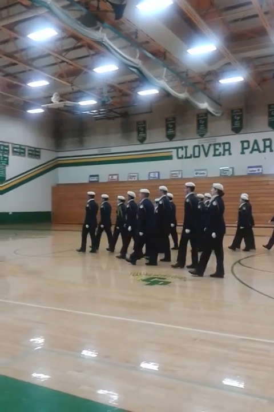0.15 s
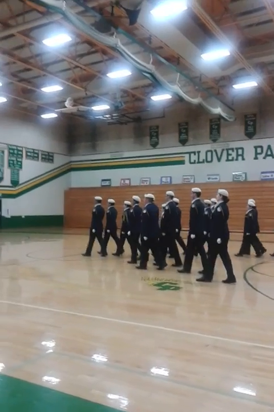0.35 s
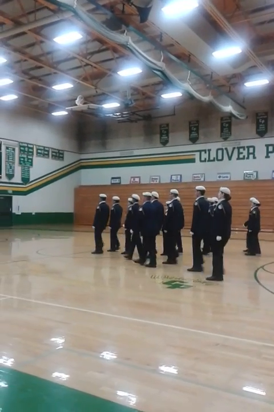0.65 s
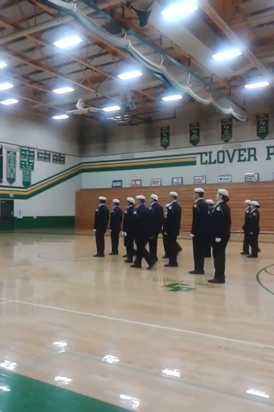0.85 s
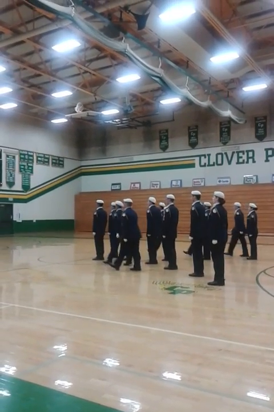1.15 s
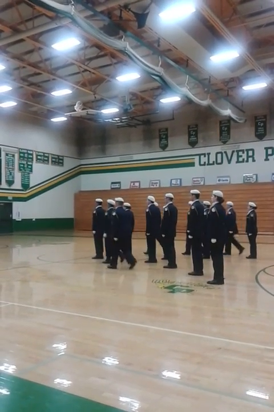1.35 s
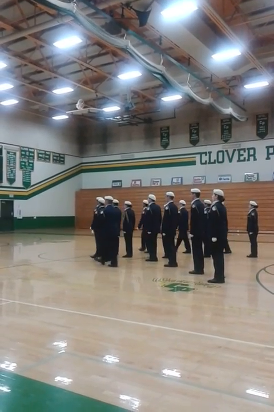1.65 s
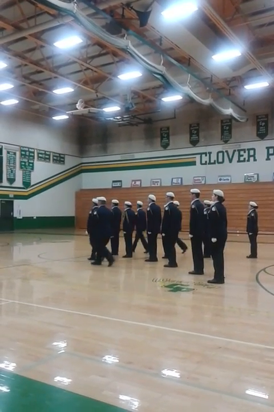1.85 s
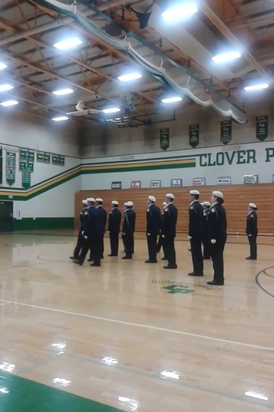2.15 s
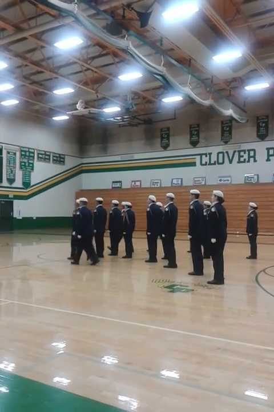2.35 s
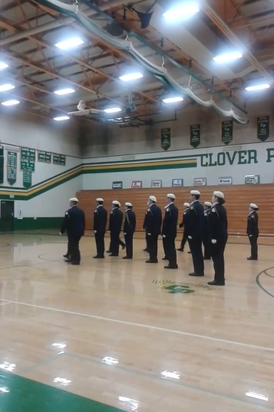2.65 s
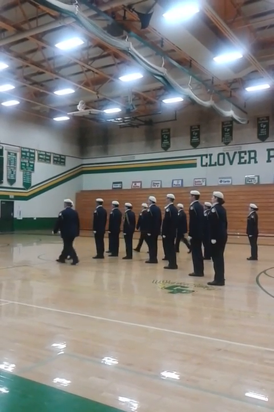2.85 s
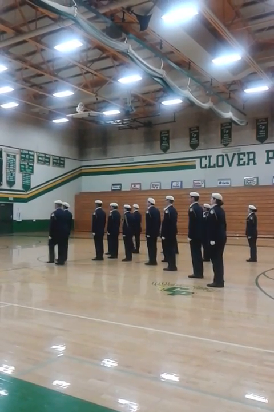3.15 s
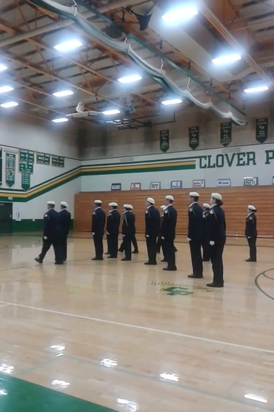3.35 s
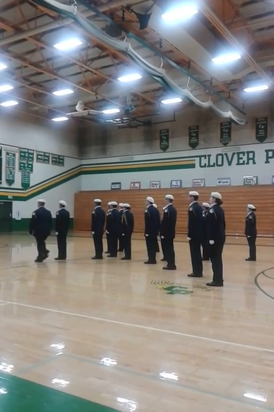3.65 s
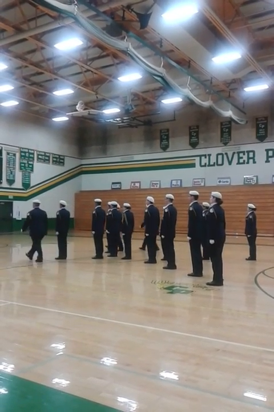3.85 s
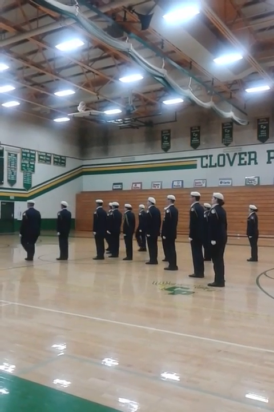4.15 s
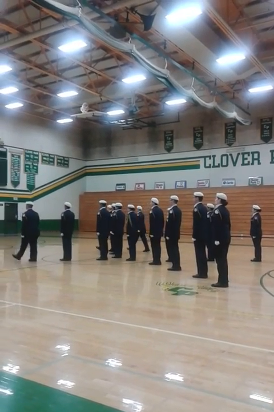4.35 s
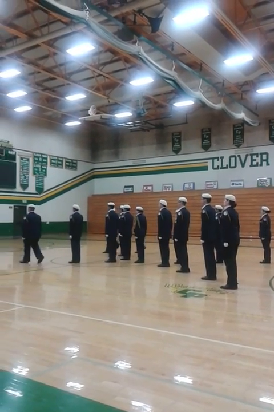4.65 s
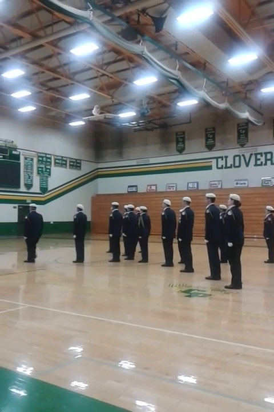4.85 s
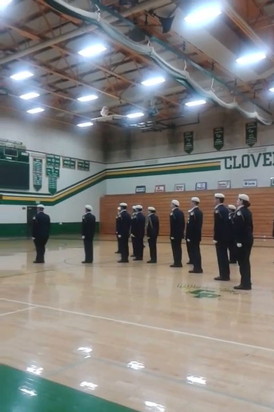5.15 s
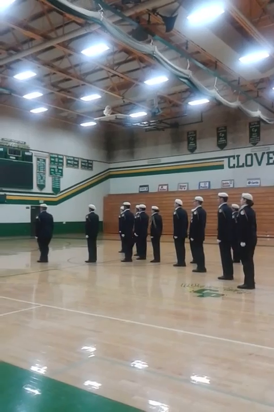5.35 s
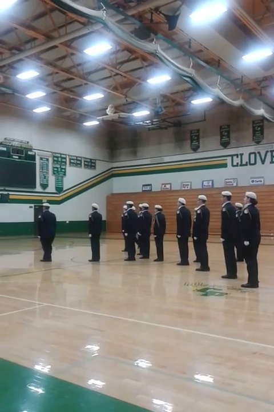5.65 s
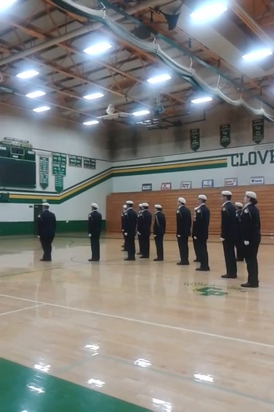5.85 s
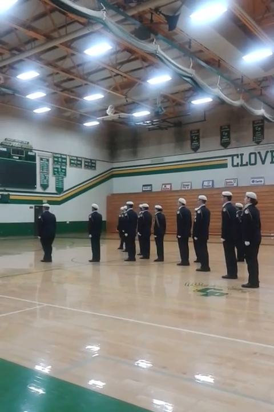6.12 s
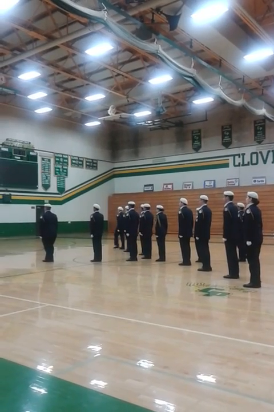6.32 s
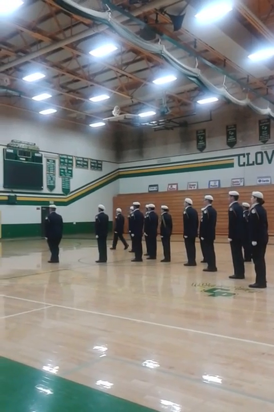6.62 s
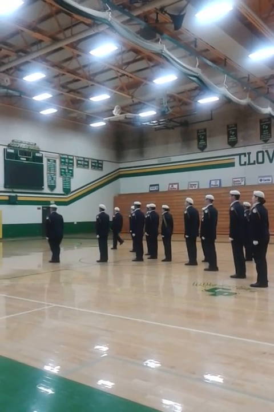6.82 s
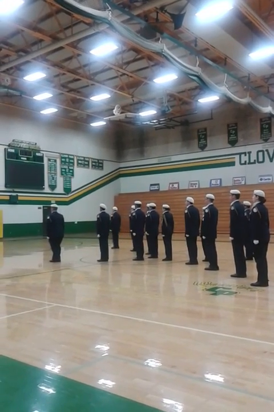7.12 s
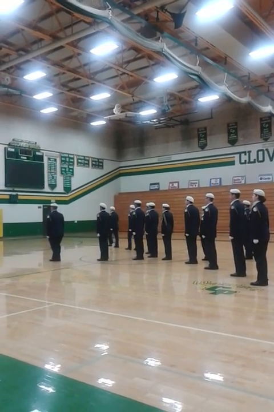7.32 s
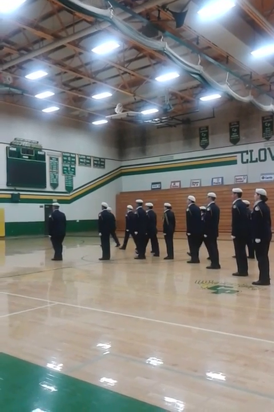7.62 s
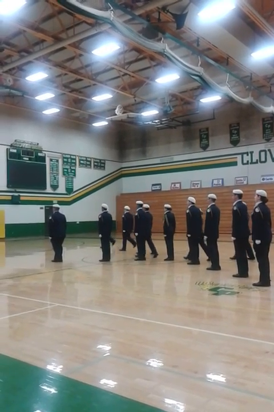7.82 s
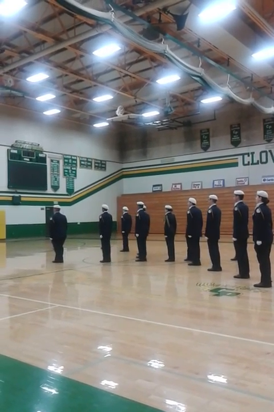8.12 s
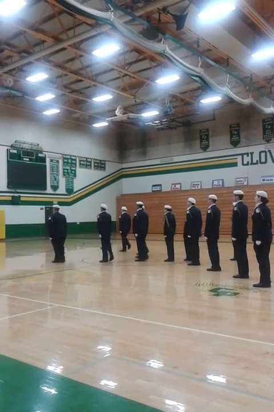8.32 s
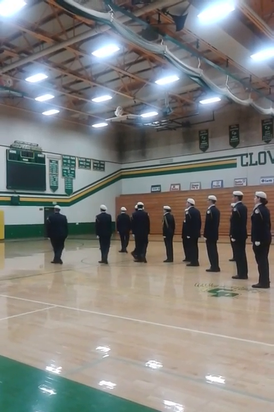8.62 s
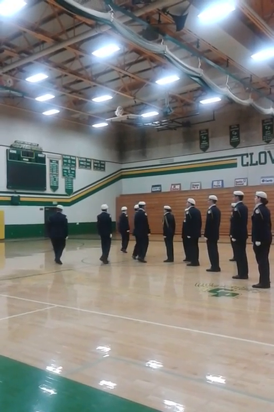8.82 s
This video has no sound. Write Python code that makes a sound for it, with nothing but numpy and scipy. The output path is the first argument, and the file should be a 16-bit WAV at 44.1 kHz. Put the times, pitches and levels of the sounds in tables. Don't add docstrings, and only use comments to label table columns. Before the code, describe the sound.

Many hard soles strike wooden boards nearly together, giving sharp slaps with hollow thumps and a long hall tail. The first and last stamps are strongest, the middle ones varied and sometimes weaker. Between them come sparse shuffling steps, small clicks and brief squeaks; heavier steps end it. Air ducts hum softly throughout, heard from a distant handheld phone.

```python
import sys
import numpy as np
from scipy import signal
from scipy.fft import rfft, irfft
from scipy.io import wavfile
from scipy.ndimage import uniform_filter1d

SR = 44100
rng = np.random.default_rng(int(sys.argv[2]) if len(sys.argv) > 2 else 0)


def voltage_ratio(level):
    return 10 ** (np.asarray(level, float) / 20)


def unload_wav(signal):
    wavfile.write(
        sys.argv[1],
        SR,
        np.round(np.clip(np.atleast_2d(signal).T, -1, 1) * 32767).astype(np.int16),
    )


N = 396018


def colour(x, points):
    hz, db = np.transpose(points)
    f = np.maximum(np.fft.rfftfreq(len(x), 1 / SR), 1)
    level_db = np.interp(np.log(f), np.log(hz), db, db[0] - 30, db[-1] - 30)
    return irfft(rfft(x) * voltage_ratio(level_db), len(x))


def unit(x):
    return x / np.sqrt(np.mean(x ** 2))


def add(track, s, sound):
    i = int(s * SR)
    track[i:i + len(sound)] += sound[:len(track) - i]


def walk(rate_hz):
    k = int(SR / rate_hz)
    held = np.repeat(rng.standard_normal(N // k + 1), k)
    return 0.92 * uniform_filter1d(uniform_filter1d(held, k), k)[:N]


def burst(points, length_s, t, rise_s):
    noise = unit(colour(rng.standard_normal(len(t)), points))
    y = noise * (1 - np.exp(-t / rise_s)) * np.exp(-t / length_s)
    return y / np.abs(y).max()


def all_round(points, like):
    pulse = np.roll(colour(signal.unit_impulse(len(like)), points), 128)
    return unit(pulse) * np.sqrt(np.mean(like ** 2))


# pitch_hz, width_hz, level_db
BOARD_MODES = [(108.6, 140, -23.5), (179.7, 51, -8), (245.5, 39.5, 3.5), (286.3, 45.4, 13), (351, 62, -1.5)]


def thud(t, push_s, spot):
    hz, width_hz, db = np.transpose(BOARD_MODES)[:, :, None]
    chance = rng.standard_normal((2, len(BOARD_MODES), 1))
    level = voltage_ratio(db + 2.5 * chance[0])
    mode_hz = spot * hz * (1 + 0.039 * chance[1])
    ring = level * np.exp(-np.pi * width_hz * t) * np.sin(2 * np.pi * mode_hz * t)
    y = ring.sum(axis=0) * (1 - np.exp(-t / push_s))
    return y / np.abs(y).max()


# start_s, board_pitch_ratio, hall_share_db, hardness_db_per_octave
BEATS = [(0, 1.02, -0.5, -1), (.65, 0.99, 0, -0.5), (1.2, 0.96, 9, 0), (1.69, 0.97, 4, 1),
         (2.26, 1.006, 0.5, -1), (2.79, .82, 2, 0.5), (3.34, 0.99, -2.5, -6.5), (3.89, 0.97, -1, -3.5),
         (4.42, 0.97, 3, 1), (4.88, 1.067, -1.5, -0.85), (6.0, 0.967, 2.5, -2), (7.0, 0.96, 3, 1),
         (7.68, 1.047, -1, -4), (8.03, 1.004, -1, 0.45), (8.5, 1, 2.5, -3)]
# pitch_hz, density_db_per_hz
SOLE = [(210, -29.5), (350, -9.5), (388, -4), (436, -16), (512, -14), (683, -4.5), (880, -4), (1270, -6.5),
        (1930, -7), (2400, -15), (2850, -16), (3590, -15.5), (5500, -32), (7150, -51.5), (12100, -120)]
# pitch_hz, density_db_per_hz
SOLE_TOP = [(2650, -28), (4500, -5), (6360, 2), (8820, 4.5), (10800, -7.5), (14500, -16.5), (15500, -45)]
# pitch_hz, level_db
BOARD_LEAD = [(500, -15), (1100, -2.5), (1800, -1), (2600, -7.5), (5000, -42.5)]
BOARD_LOW_HZ = 103
LATE_S, LATE_HARDNESS_DB, LATE_HALL_DB = 0.091, -2.2, 1


def feet(rows, slap_s, rise_s, push_s, lead_db, boom_db):
    near, sent, t = np.zeros(N), np.zeros(N), np.arange(4096) / SR
    for s, slap_db, thud_db, top_db in rows:
        start_s, spot, hall_db, hardness = [beat for beat in BEATS if beat[0] <= s + 0.02][-1]
        late = np.clip((s - start_s) / LATE_S, 0, 1)
        hall_db = hall_db + late * LATE_HALL_DB
        hardness = hardness + late * LATE_HARDNESS_DB
        sole = [(hz, db + hardness * np.log2(hz / 1000)) for hz, db in SOLE]
        slap = voltage_ratio(slap_db) * burst(sole, slap_s, t, rise_s)
        top = voltage_ratio(top_db) * burst(SOLE_TOP, 0.56 * slap_s, t, 0.00015)
        boards = voltage_ratio(thud_db) * thud(t, push_s, spot)
        add(near, s, slap + top + boards)
        spread = voltage_ratio(boom_db) * boards * np.exp(-t / 0.013)
        to_hall = all_round(sole, slap) + voltage_ratio(-2.5) * all_round(SOLE_TOP, top) + spread
        add(sent, s, voltage_ratio(hall_db) * to_hall)
        lead = voltage_ratio(slap_db + lead_db) * burst(BOARD_LEAD, 0.0036, t[:400], 0.0001)[::-1]
        add(near, max(s - 400 / SR, 0), lead)
    low_cut = signal.butter(2, BOARD_LOW_HZ, "high", fs=SR, output="sos")
    return signal.sosfilt(low_cut, [near, sent])


# start_s, slap_db, thud_re_slap_db, top_re_slap_db
STAMPS = [(0.658, -20, -8.5, -14), (0.667, 0.5, -6.5, -29), (0.691, -3.5, -0.5, -11.5),
          (0.718, -8.5, -10, -11), (0.734, -9.5, 7, -14), (0.794, -5, 0.5, -26), (2.826, -12, -5.5, -14),
          (2.857, -27, 12, -21), (2.901, -19.5, -21, -12.5), (4.894, -4, -13, -28),
          (4.899, -8.5, 3.5, -14.5), (4.928, -5, -2, -13), (4.974, -13.5, 7, -6.5), (4.992, -1, -1, -24.5),
          (7.026, -10, -8, -14.5), (7.084, -11, -9, -29), (7.099, -17.5, 5.5, -28), (7.137, -22.5, 0, -25),
          (8.046, -2, -8, -12), (8.078, -2, -7.5, -17), (8.121, -4.5, 0, -23), (8.152, -6.5, 1, -21),
          (8.164, -8, -1, -12.5), (8.192, -15.5, 3, -15), (8.241, -6.5, -8.5, -22), (8.137, -5.5, 1.5, -13),
          (8.181, -8, -1, -16), (8.285, -14, -2.5, -14.5), (.706, -2, -5, -28), (4.946, -12.5, -6, -14)]


def hard_stamps():
    rows = [(s, slap, slap + boards, slap + top) for s, slap, boards, top in STAMPS]
    return feet(rows, slap_s=0.0056, rise_s=0.00063, push_s=0.0017, lead_db=-16.5, boom_db=-0.62)


# start_s, thud_db, slap_re_thud_db
STEPS = [(0.009, -31.5, -6), (0.186, -27, -3.5), (0.213, -28, -0.5), (0.241, -21, -6), (0.296, -30.5, -9.5),
         (0.347, -30.5, 1), (1.217, -25.5, -8), (1.705, -29.5, -12), (1.825, -26.5, -7.5), (1.903, -36, -4),
         (1.949, -40, -9.5), (2.271, -25.5, -8), (2.387, -31.5, -3), (2.799, -33, -10), (3.361, -23, -8),
         (3.387, -24.5, -6.5), (3.479, -28, -13), (3.905, -27, -8), (3.957, -33, -2), (4.44, -33.5, -11),
         (4.521, -38, -1), (4.607, -46.5, 1), (6.055, -36.5, -6.5), (6.538, -33, -5.5),
         (6.613, -35.5, -4.5), (6.676, -40.5, -22), (3.923, -29, -8), (3.982, -30, -12), (4.008, -35, -15),
         (0.158, -38.5, 4.5),
         (7.703, -29.5, -4.5), (7.768, -20, -14), (7.8, -28, -13.5), (7.99, -33, -12),
              (8.528, -19.5, -4.5), (8.598, -10.5, -8), (8.654, -20, -11), (8.813, -33.5, -9.5),
              (8.922, -21, -20)]
STEP_TOP_DB = -24


def marching_steps():
    rows = [(s, boards + slap, boards, boards + slap + STEP_TOP_DB)
            for s, boards, slap in STEPS]
    return feet(rows, slap_s=0.0042, rise_s=0.001, push_s=0.0055, lead_db=-8, boom_db=2.2)


# start_s, level_db, pitch_hz, top_re_tick_db, length_s
TICKS = [(1.956, -35.5, 1060, -9, 0.003), (2.043, -30, 1280, -18, 0.0055),
         (2.109, -30.5, 1010, -50, 0.0041), (2.212, -45.5, 1920, -39, 0.0044),
         (2.248, -29, 1090, -15, 0.0076), (3.362, -32.5, 1180, -16, 0.0035), (3.868, -39, 1740, -21, 0.006),
         (3.904, -34, 1237, -29, 0.004), (3.926, -43, 930, -27, 0.0022), (3.981, -24, 990, -14, 0.0047),
         (4.224, -34, 1720, -14, 0.025), (4.47, -35, 1300, -19, 0.0046), (6.536, -41, 956, -25.5, 0.0038)]
# start_s, level_db, pitch_hz, top_re_tick_db, length_s
HIGH_TICKS = [(0.345, -40, 3430, -23.5, 0.0016), (2.2506, -31.5, 3480, -7, 0.0035),
              (3.698, -56, 3700, -28, 0.0033), (3.779, -44.5, 3660, -13, 0.0026),
              (3.9873, -29.5, 3530, -8.5, 0.003), (4.225, -27.5, 3820, -34, 0.0025),
              (4.361, -39, 3370, -24, 0.003)]
# start_s, level_db, pitch_hz, top_re_crack_db,
# length_s
CRACKS = [(.668, 7, 3200, -12, 0.001), (0.81, -8.5, 850, -32, 0.0087), (2.825, -10, 1950, -14, 0.0029),
          (4.945, -3.5, 840, -28, 0.0051), (7.22, -19, 1940, -9, 0.0028), (7.086, -13, 3600, -7.5, 0.0014),
          (7.095, -15, 3300, -17, 0.0018), (7.051, -24, 4500, -6, .003), (8.052, -7.5, 1600, -26, 0.0026),
          (8.071, -3, 830, -25, 0.009), (8.167, -2.5, 2800, -32, 0.0034), (8.154, -3, 2500, -19, 0.0043),
          (4.925, -18, 6100, -17, 0.005), (4.974, -19, 8000, -8, .002), (2.858, -21, 530, -13.5, .003)]


def ticks():
    out, t = np.zeros(N), np.arange(2048) / SR
    for s, db, hz, top_db, length_s in TICKS + HIGH_TICKS + CRACKS:
        length_s = max(length_s, 0.0005)
        body = [(0.14 * hz, -12), (0.67 * hz, -4), (hz, 0), (1.34 * hz, -5), (1.6 * hz, -22)]
        ring = burst(body, length_s, t, 0.00056)
        edge = voltage_ratio(top_db) * burst(SOLE_TOP, length_s, t, 0.00021)
        add(out, s, voltage_ratio(db) * (ring + edge))
    return out


# start_s, level_db, start_hz, end_hz, length_s
SQUEAKS = [(.001, -57.5, 3750, 3700, 0.071), (0.11, -52.5, 3680, 3630, 0.092),
           (1.638, -50, 4000, 3597, 0.028), (2.005, -49, 4000, 3540, 0.027), (3.79, -55, 3660, 3980, 0.025),
           (3.827, -53.5, 4000, 3655, 0.03), (4.229, -48.5, 4090, 3840, .08),
           (4.567, -53, 3630, 3900, 0.024), (4.608, -54.5, 4000, 3720, 0.034),
           (6.107, -64, 4200, 4145, .03), (7.906, -49, 3440, 3400, 0.018)]


def squeaks():
    out = np.zeros(N)
    for s, db, start_hz, end_hz, length_s in SQUEAKS:
        n = int(length_s * SR)
        wobble = 1 + 0.32 * uniform_filter1d(rng.standard_normal(4096), 30)[:n]
        phase = 2 * np.pi * np.cumsum(np.linspace(start_hz, end_hz, n) * wobble) / SR
        add(out, s, voltage_ratio(db) * np.hanning(n) * np.sin(phase))
    return out


# delay_s, level_db, strongest_hz
ECHOES = [
    (0.01, -10.5, 1543),
    (0.03, -9.5, 796),
    (.074, -14, 1200),
]


def echoes(x):
    response, t = np.zeros(8192), np.arange(1024) / SR
    for delay_s, db, hz in ECHOES:
        trusses = [(100, -8), (hz, 0), (4000, -6), (12000, -12)]
        add(response, delay_s, voltage_ratio(db) * burst(trusses, 0.0068, t, 0.0006) / 6)
    return signal.fftconvolve(x, response)[:N]


# pitch_hz, t60_s, level_db
HALL = [(83, 7.5, -14.5), (159.3, 2.43, 1), (259, 1.53, -2), (540, 1.77, 1.5), (1200, 1.76, -5.5),
        (2630, 1.63, 0), (4480, 1.255, 1), (7660, 0.71, 3.5), (12000, 0.14, -1)]
HALL_DB, HALL_BUILD_S = -32.5, 0.013


def hall(x):
    t = np.arange(3 * SR) / SR
    spectrum = rfft(rng.standard_normal(len(t)))
    log_f = np.log(np.maximum(np.fft.rfftfreq(len(t), 1 / SR), 1))
    log_centres = np.log([row[0] for row in HALL])
    tail = np.zeros(len(t))
    for k, (hz, t60_s, db) in enumerate(HALL):
        share = np.interp(log_f, log_centres, np.eye(len(HALL))[k])
        tail += voltage_ratio(db - 60 * t / t60_s) * irfft(spectrum * share, len(t))
    build_up = 1 - np.exp(-(t / HALL_BUILD_S) ** 2)
    return signal.fftconvolve(x, voltage_ratio(HALL_DB) * tail * build_up)[:N]


# pitch_hz, density_db_per_hz
CLOTH = [(250, 0), (500, 4.5), (1100, 1), (2000, -2), (3800, -7), (4500, -15), (6000, -18.5), (8000, -13),
         (10000, -17), (12500, -20.5), (14600, -25.5)]
# time_s, rustle_db
MOTION = [(0, -54.5), (.25, -53.5), (.6, -59), (1.6, -61), (2.8, -66.5), (3.7, -64), (4.45, -62.5),
          (4.8, -69.5), (5.6, -64), (6.4, -70.5), (7.0, -71.5), (7.65, -64), (8.98, -59.5)]
# start_s, flap_db
HALTS = [
    (.68, -61),
    (2.83, -69),
    (4.91, -56),
    (7.03, -70),
    (8.06, -57),
]
FLAP_T60_S, FREEZE_DB, FREEZE_S = 0.9, -19, 0.28


def rustle():
    grains = voltage_ratio(2.6 * np.minimum(rng.exponential(size=N), 8.5)) * rng.standard_normal(N)
    t = np.arange(N) / SR
    moving, flaps = voltage_ratio(np.interp(t, *np.transpose(MOTION))), np.zeros(N)
    for s, db in HALTS:
        since = np.maximum(t - s, 0)
        moving = moving * voltage_ratio(FREEZE_DB * (t > s) * np.exp(-(since / FREEZE_S) ** 4))
        flaps += (t > s) * voltage_ratio(db - 60 * since / FLAP_T60_S)
    return unit(colour(grains, CLOTH)) * (moving + flaps) * voltage_ratio(9.5 + 1.3 * walk(5.8))


# pitch_hz, density_db_per_hz
AIR = [(15, -35.5), (25, -22), (75, -2), (130, -15.5), (175, -6.5), (380, -12), (1200, -28.5), (3300, -35),
       (4600, -27), (6000, -32.5), (8300, -30), (11000, -30.5), (14600, -31)]
AIR_DB = -52.5


def ventilation():
    return unit(colour(rng.standard_normal(N), AIR)) * voltage_ratio(AIR_DB - 5.5 + 0.62 * walk(8.8))


def scene():
    stamps, stamps_sent = hard_stamps()
    steps, steps_sent = marching_steps()
    small = ticks() + squeaks()
    room = echoes(stamps + steps) + hall(stamps_sent) + hall(steps_sent + voltage_ratio(-11.0) * small)
    return (stamps + steps + small + room + rustle() + ventilation())[None]


STARVE_HZ, STARVE_DB = 7800, -58


def starve(x):
    f, _, z = signal.stft(x, SR, nperseg=1024)
    power = np.abs(z) ** 2
    band = uniform_filter1d(power, size=7, axis=0)
    whole = uniform_filter1d(power.sum(axis=0), size=3)
    lost = (band < voltage_ratio(STARVE_DB) ** 2 * whole) & (f[:, None] > STARVE_HZ)
    return signal.istft(z * ~lost, SR, nperseg=1024)[1][:N]


def top_cut(x):
    return signal.sosfilt(signal.butter(12, 15960, fs=SR, output="sos"), x)


def record(dry):
    clipped = np.clip(dry[0], -1, 1)
    return top_cut(starve(clipped)[None])


dry = scene()
out = record(dry)
unload_wav(out)
```